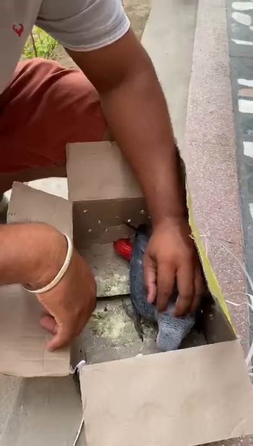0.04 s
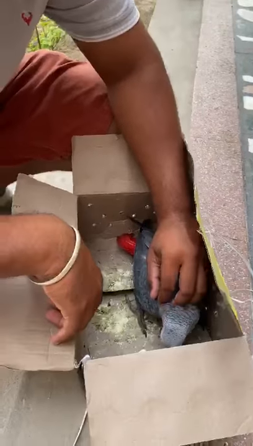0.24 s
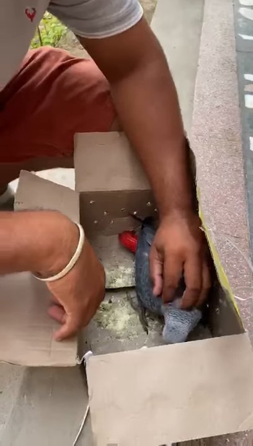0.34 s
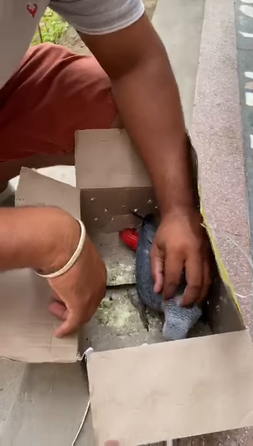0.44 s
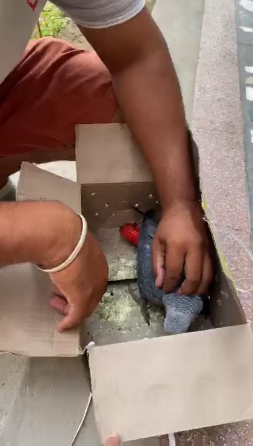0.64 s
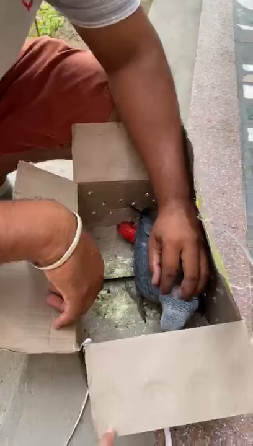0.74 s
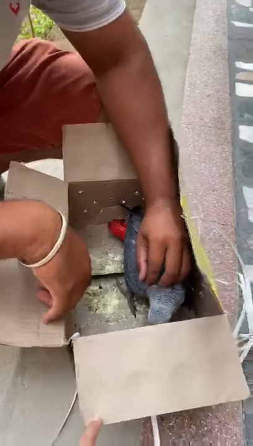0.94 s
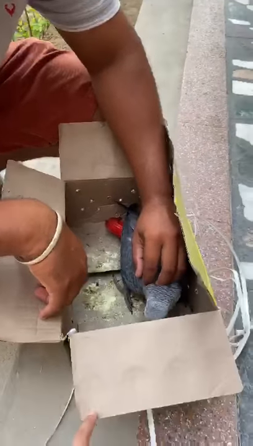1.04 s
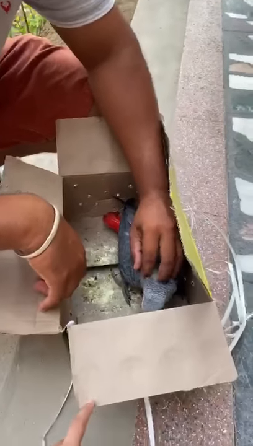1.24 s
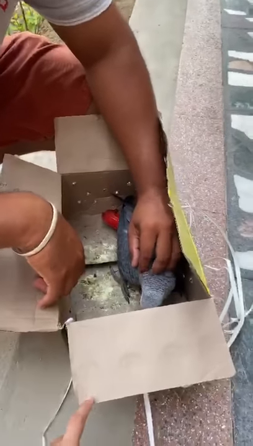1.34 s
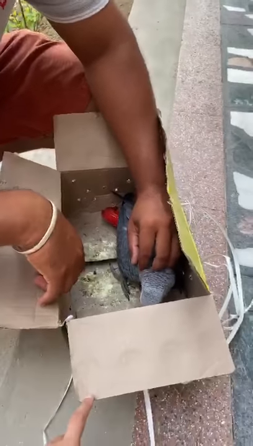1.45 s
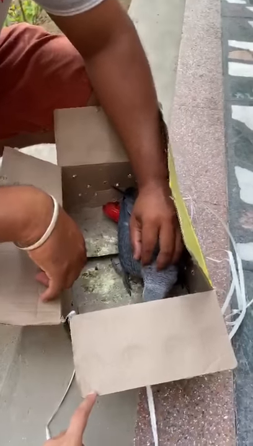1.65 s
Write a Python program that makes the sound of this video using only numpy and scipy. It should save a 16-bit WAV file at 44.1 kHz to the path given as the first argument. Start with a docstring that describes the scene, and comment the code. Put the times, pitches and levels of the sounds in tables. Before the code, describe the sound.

A parrot in a cardboard box rasps harshly twice, close and slightly left: briefly at about 0.6 seconds, then longer from 0.85 to 1.1 seconds. Thin squeaks fall in and between the rasps. Before them, in the first half second, faint hoarse chirps come from farther off. The porch walls add a short echo, and a low outdoor rumble with a faint hum continues until about 1.5 seconds.

```python
"""On a hard-walled porch, a parrot held in a cardboard box gives two harsh rasps.
Each rasp is an uneven pulse train ringing the throat; thin squeaks fall in and between them.
The box adds narrow resonances and the porch echoes. Hoarse chirps sound farther off,
mostly beforehand, over a low outdoor rumble and a faint hum."""
import sys
import numpy as np
from scipy import signal
from scipy.fft import rfft, irfft, next_fast_len
from scipy.io import wavfile
from scipy.ndimage import uniform_filter1d, map_coordinates

SR = 44100
rng = np.random.default_rng(int(sys.argv[2]) if len(sys.argv) > 2 else 0)


def transcribe(signal):
    """Save signal, clipped to [-1, 1], as a 16-bit WAV file at the path in sys.argv[1]."""
    frames = np.atleast_2d(signal).T
    limited = np.clip(frames, -1, 1)
    pcm = np.round(limited * 32767).astype(np.int16)
    wavfile.write(sys.argv[1], SR, pcm)


N = 74970

# Outdoor rumble: freq_hz, gain_db
RUMBLE_SPECTRUM = [(15, -46), (25, -10), (59, -1), (112, -6), (145, -2.5), (178, -7.5), (219, -6.5),
                   (418, -10), (1520, -19.5), (1920, -23.5), (2420, -25), (3380, -29.5), (6800, -47),
                   (7350, -63.5), (12000, -48), (15600, -87), (22000, -120)]
# Rumble width: freq_hz, side_minus_mid_db
RUMBLE_SIDE = [(60, -55), (120, -32), (230, -22.5), (440, -5), (850, -0.5), (1650, -5), (3200, 3),
               (6210, 0), (12000, -5)]
# Hum tones: freq_hz, level_db, left_minus_right_db
HUM_TONES = [(63.5, -61, -0.5), (363.2, -62, -4.5), (419.7, -68.5, -7)]
# Far chirps: start_s, length_s, pitch_hz, level_db, roughness
CHIRP_NOTES = [(0, 0.08, 2323, -44, 0.07), (0, 0.057, 2780, -45, .04), (.174, .014, 2844, -36.5, 0.03),
               (.21, 0.023, 2873, -37, .04), (.25, 0.057, 2374, -44.5, 0.04),
               (.255, 0.049, 2853, -47, 0.13), (.335, 0.014, 2300, -57, 0.08),
               (.385, 0.026, 2882, -41.5, 0.02), (.414, 0.013, 2993, -34.5, 0),
               (.432, 0.035, 2847, -39, 0.03), (.49, 0.05, 2340, -42.5, 0.06),
               (.485, 0.061, 2850, -72, .04), (.775, 0.051, 2984, -42, 0.12)]
# Chirp hiss: freq_hz, gain_db
CHIRP_HISS_SPECTRUM = [(700, -22), (1500, 5.5), (2400, 10.5), (3400, 1.5), (4200, -7), (5800, -1.5),
                       (7500, -32.5), (9500, -9), (12000, -22)]
# Throat resonances, a curve per rasp: time_s, main_hz, main_db, low_db, upper_db, top_db
THROAT_CURVES = [
    [(0.628, 4200, -29, -51, -42.5, -57), (0.636, 4290, -34, -58, -50, -49),
     (0.646, 4480, -26.5, -42, -32.5, -42), (0.654, 4410, -23.5, -50, -33.5, -35),
     (0.674, 3930, -37.5, -35, -34, -39.5), (0.7, 3820, -33, -51, -48, -62)],
    [(0.848, 5060, -44, -41, -33.5, -34), (0.858, 5130, -26.5, -45, -29.5, -39.5),
     (0.878, 4730, -39.5, -45, -35, -46), (0.92, 4280, -32.5, -41, -41.5, -63),
     (0.956, 4330, -32, -43, -41.5, -50), (0.962, 4430, -45, -42, -53, -48),
     (0.992, 4116, -27.5, -41.5, -47, -57), (1.048, 4390, -27, -42, -48.5, -44),
     (1.085, 4740, -36, -42, -47, -64)],
]
# Glides per rasp, for the low, upper and top resonances: start_hz, end_hz
THROAT_GLIDES = [
    [(2380, 2307), (6050, 5750), (11300, 10970)],
    [(2080, 2410), (6100, 6440), (10000, 10900)],
]
# Ring time constants per rasp: main_s, low_s, upper_s, top_s
THROAT_RING_S = [(.0003, 0.0012, 0.00039, 0.00018), (.00036, 0.00051, 0.00035, 0.00018)]
# Left minus right per rasp: main_db, low_db, upper_db, top_db
THROAT_PAN_DB = [(1, 3.8, -7.5, 0.0046), (2, 1.3, -5.5, 0.029)]
# Air hiss in the rasps: freq_hz, gain_db
BREATH_SPECTRUM = [(710, -60), (1200, -30), (1710, -30), (2290, -12), (3110, -37), (3460, -11.5),
                   (4450, -7), (5090, -4), (6230, -20), (7560, -32), (8080, -28), (11000, -27),
                   (12000, -25), (15600, -57), (22000, -120)]
# Parrot squeaks: start_s, length_s, pitch_hz, level_db, roughness
SQUEAK_NOTES = [(.636, 0.0074, 4130, -28, 0.06), (.6495, 0.0027, 4370, -19.5, 0.08),
                (.661, 0.0278, 3490, -34, .06), (.7465, 0.0063, 4722, -22, 0.01),
                (.7555, 0.0083, 4720, -29, 0.07), (.784, 0.02, 4800, -42.5, .08),
                (.854, 0.019, 5070, -32, .06), (.941, 0.0081, 4486, -29.5, 0.09),
                (.953, 0.0047, 4510, -29, 0.09), (.970, 0.0021, 4380, -28, 0.1)]
# Box and nearby walls: centre_hz, width_hz, gain_db
BOX_RESONANCES = [(3650, 195, 4.5), (4020, 54, 3), (3985, 50, 3), (4350, 43, -3.5), (4520, 38, 4.5),
                  (4588, 53, 2.5), (5513, 46, 8), (6013, 93, 4.5)]
# Porch decay: freq_hz, t60_s
PORCH_DECAY = [(500, 0.23), (2400, 0.66), (4300, 0.47), (6500, 0.55), (11000, 0.42)]
# Porch echo width: freq_hz, left_right_correlation
PORCH_CORRELATION = [(2000, -0.24), (3000, -0.45), (4300, 0.24), (6000, 0.043), (9000, .75)]
# Overall treble colour: freq_hz, gain_db
TREBLE_COLOUR = [(3000, -1), (6300, 0), (6800, -3.5), (7600, -8.5), (8400, 6.5), (9500, 1.5), (12000, -1.5)]


def amp(db):
    """Decibels to gain."""
    return 10 ** (np.asarray(db) / 20)


def pan(db):
    """Stereo gains for a left-minus-right level."""
    return amp(db * np.array([[.5], [-.5]]))


def along(points, hz):
    """Interpolate (freq_hz, value) points on a log axis."""
    freqs_hz, values = np.transpose(points)
    return np.interp(np.log(hz + 1), np.log(freqs_hz + 1), values)


def wobble(rate_hz):
    """Smooth random curve, rate_hz knots a second."""
    return map_coordinates(rng.standard_normal(N // 8), [np.arange(N) * rate_hz / SR], mode="wrap")


def filtered(x, response):
    """Apply a frequency response."""
    size = next_fast_len(x.shape[-1] + 8192)
    return irfft(rfft(x, size) * response(np.fft.rfftfreq(size, 1 / SR)), size)[..., :x.shape[-1]]


def coloured(x, spectrum):
    """Shape by a spectrum, scale to rms 1."""
    x = filtered(x, lambda hz: amp(along(spectrum, hz)))
    return x / np.sqrt(np.mean(x ** 2) + 1e-20)


def gate(start_s, end_s, edge_s):
    """Soft-edged window."""
    t = np.arange(N) / SR
    return (1 + np.tanh(2 * (t - start_s) / edge_s)) * (1 + np.tanh(2 * (end_s - t) / edge_s)) / 4


def whistles(notes, octave_db, fall, edge_s, flutter_hz):
    """Short notes with shaky, sagging pitch; returns sound and envelope."""
    t, out, envelope = np.arange(N) / SR, np.zeros(N), np.zeros(N)
    for start_s, length_s, pitch_hz, level_db, roughness in notes:
        progress = np.clip((t - start_s) / length_s, 0, 1) - .5
        hz = pitch_hz * (1 - fall * progress + roughness * wobble(flutter_hz))
        phase = 2 * np.pi * np.cumsum(hz) / SR
        level = amp(level_db) * gate(start_s, start_s + length_s, edge_s)
        out += level * np.sqrt(2) * (np.sin(phase) + amp(octave_db) * np.sin(2 * phase))
        envelope += level
    return out, envelope


def rumble():
    """Low outdoor noise, near mono in the bass."""
    mid = rng.standard_normal(N)
    side = filtered(rng.standard_normal(N), lambda hz: amp(along(RUMBLE_SIDE, hz)))
    return amp(-48) * coloured(np.array([mid + side, mid - side]), RUMBLE_SPECTRUM)


def hum(swell_db=3, waver_rad=0.43):
    """Three faint tones wavering in level and phase."""
    t, out = np.arange(N) / SR, np.zeros((2, N))
    for hz, level_db, pan_db in HUM_TONES:
        level = np.sqrt(2) * amp(level_db + swell_db * wobble(8.92))
        out += pan(pan_db) * level * np.sin(2 * np.pi * hz * t + waver_rad * wobble(7.64))
    return out


def chirps():
    """Hoarse notes with a little hiss."""
    tone, envelope = whistles(CHIRP_NOTES, octave_db=-33, fall=0.033, edge_s=0.0038, flutter_hz=380)
    return tone + amp(-12) * envelope * coloured(rng.standard_normal(N), CHIRP_HISS_SPECTRUM)


def porch(x, delay_s=0.0032, build_s=0.002):
    """Hard-wall echo: each frequency decays at its own rate."""
    hz, t, noise = signal.stft(rng.standard_normal((2, SR)), SR, nperseg=256)
    decay = amp(-60 * t / along(PORCH_DECAY, hz)[:, None]) * (1 - np.exp(-t / build_s))
    pair = signal.istft(noise * decay, SR, nperseg=256)[1]
    width_rad = lambda f: np.arccos(along(PORCH_CORRELATION, f)) / 2
    mid, side = filtered(pair, lambda f: np.array([np.cos(width_rad(f)), np.sin(width_rad(f))]))
    tail = np.array([mid + side, mid - side])
    echo = signal.fftconvolve(x[None], tail / np.linalg.norm(tail[0]), axes=1)[:, :N]
    return filtered(echo, lambda f: np.exp(-2j * np.pi * f * delay_s))


def throat_ring(times_s, sizes, hz, ring_s):
    """Each pulse rings a resonance that swells and dies; running rms held at 1."""
    index = (times_s * SR).astype(int)[:, None] + np.arange(1, 400)
    age_s = index / SR - times_s[:, None]
    envelope = sizes[:, None] * (age_s / ring_s) ** 2 * np.exp(-age_s / ring_s)
    grains = envelope * np.sin(2 * np.pi * hz[:, None] * age_s)
    train = np.bincount(index.ravel(), grains.ravel(), N)[:N]
    return train / np.sqrt(np.abs(uniform_filter1d(train ** 2, 700)) + 1e-9)


def rasps(pulse_hz=559.8, jitter=.4, scatter_db=2, flutter_db=1.5, flutter_hz=220.7):
    """Uneven pulses drive four gliding throat resonances; air hisses along."""
    t, out = np.arange(N) / SR, np.zeros((2, N))
    for curve, glides, rings_s, pans_db in zip(THROAT_CURVES, THROAT_GLIDES, THROAT_RING_S, THROAT_PAN_DB):
        knots_s, main_hz, *levels_db = np.transpose(curve)
        times_s = np.cumsum(np.exp(jitter * rng.standard_normal(1500))) / pulse_hz
        sizes = amp(scatter_db * rng.standard_normal(len(times_s)))
        centres_hz = [np.interp(times_s, knots_s, main_hz)]
        centres_hz += [np.interp(times_s, knots_s[[0, -1]], glide) for glide in glides]
        voice = np.zeros((2, N))
        for hz, db, ring_s, pan_db in zip(centres_hz, levels_db, rings_s, pans_db):
            level = amp(np.interp(t, knots_s, db))
            voice += pan(pan_db) * level * throat_ring(times_s, sizes, hz, ring_s)
        breath = coloured(rng.standard_normal(N), BREATH_SPECTRUM)
        breath *= amp(np.interp(t, knots_s, levels_db[0]) - 9.5)
        flutter = amp(flutter_db * wobble(flutter_hz))
        out += (voice + breath) * flutter * gate(knots_s[0], knots_s[-1], edge_s=0.0081)
    return amp(-3) * out


def squeaks():
    """The parrot's thin, very short whistles."""
    return whistles(SQUEAK_NOTES, octave_db=-21.5, fall=.01, edge_s=0.002, flutter_hz=900)[0]


def box(x):
    """Surfaces close to the bird: narrow peaks and one dip."""
    return filtered(x, lambda f: 1 + sum(
        (amp(db) - 1) * 1j * f * width_hz / (hz ** 2 - f ** 2 + 1j * f * width_hz)
        for hz, width_hz, db in BOX_RESONANCES))


def scene(left_lead_s=2e-5):
    """Parrot near and slightly left; chirps mostly echo."""
    parrot = amp(-2) * box(squeaks() + rasps())
    far = chirps()
    near = filtered(parrot, lambda hz: np.exp(1j * np.pi * hz * left_lead_s * np.array([[1], [-1]])))
    echo = porch(parrot.mean(axis=0) + amp(-2.5) * far)
    return near + amp(-5) * pan(1.6) * far + echo + rumble() + hum()


def record(dry, cutoff_hz=12100):
    """Overall treble colour: a dip near 7.6 kHz, a peak just above, then a steep band limit."""
    return filtered(dry, lambda hz: amp(along(TREBLE_COLOUR, hz)) / (1 + (hz / cutoff_hz) ** 120))


dry = scene()
out = record(dry)
transcribe(out)
```